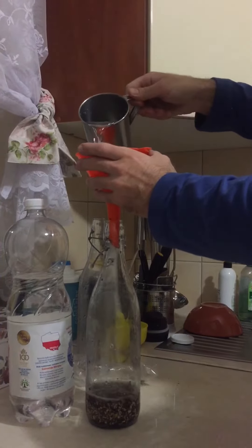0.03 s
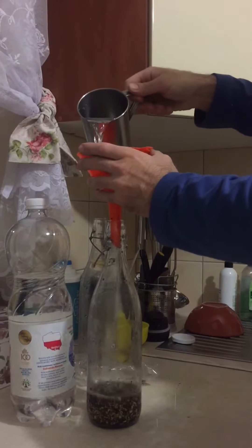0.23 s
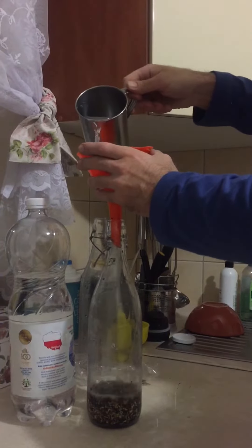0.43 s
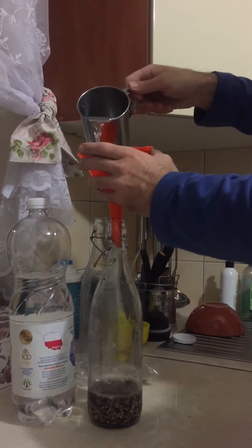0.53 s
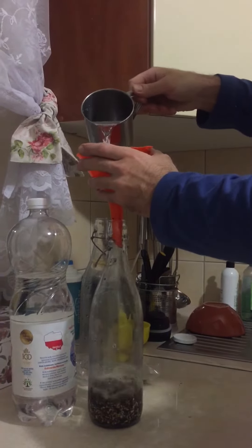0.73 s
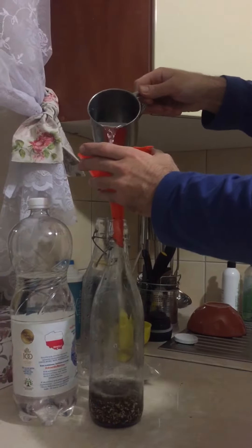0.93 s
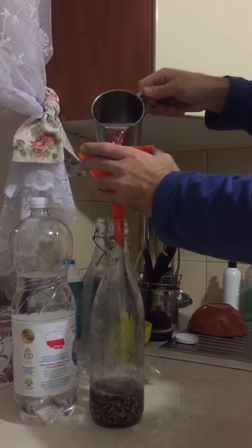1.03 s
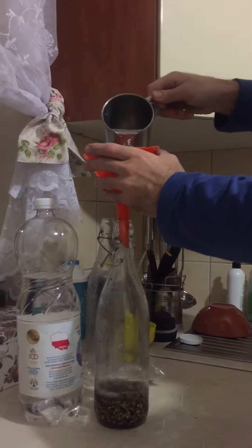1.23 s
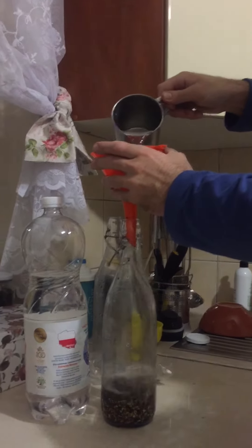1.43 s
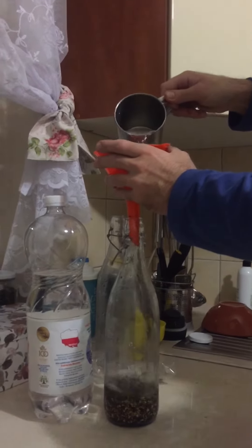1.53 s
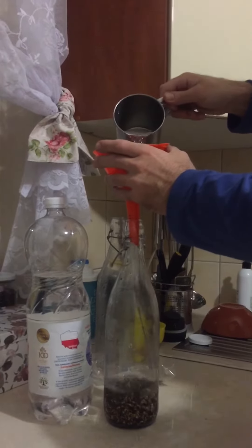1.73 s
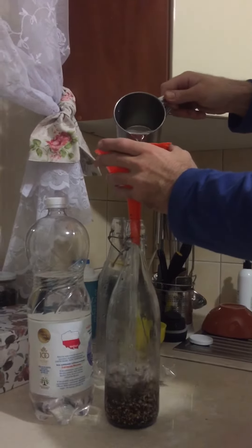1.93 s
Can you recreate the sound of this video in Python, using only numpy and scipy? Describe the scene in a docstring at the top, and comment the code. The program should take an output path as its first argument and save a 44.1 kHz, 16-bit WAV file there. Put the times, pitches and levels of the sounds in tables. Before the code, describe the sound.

Liquid poured from a metal jug gulps and bubbles down a funnel into a hollow-sounding glass bottle. The funnel ticks lightly, then the flow eases to a trickle, close to the microphone with a short kitchen echo.

```python
"""Gulps and ringing plops of liquid, poured from a metal jug through a plastic funnel into a glass bottle.
The stream sloshes, traps bubbles, throws droplets and stirs the air in the bottle, and the funnel ticks
against the neck; a faint, very high tick comes at the end. Heard close, as from one microphone in a
small kitchen: worktop and tiled walls give a short echo over a low room rumble."""
import sys
import numpy as np
from scipy import signal
from scipy.fft import rfft, irfft
from scipy.io import wavfile

SR = 44100
rng = np.random.default_rng(int(sys.argv[2]) if len(sys.argv) > 2 else 0)


def store_pcm(level_fs):
    """Save levels as 16-bit WAV."""
    pcm = np.round(np.clip(level_fs, -1, 1) * 32767).astype(np.int16)
    wavfile.write(sys.argv[1], SR, np.atleast_2d(pcm).T)


N = 88200
T = np.arange(N) / SR


def undb(db):
    """Decibels to gain."""
    return 10 ** (np.asarray(db) / 20)


def unit(x):
    """Scale to rms 1."""
    return x / np.sqrt(np.mean(x ** 2) + 1e-20)


def curve(table, column=1):
    """Gain through time from rows of time_s and a level_db in the chosen column."""
    rows = np.array(table)
    return undb(np.interp(T, rows[:, 0], rows[:, column]))


def colour(x, points):
    """Filter by rows of frequency_hz, gain_db."""
    hz, db = np.array(points).T
    bins_hz = np.maximum(np.fft.rfftfreq(len(x), 1 / SR), 1)
    return irfft(rfft(x) * undb(np.interp(np.log(bins_hz), np.log(hz), db)), len(x))


def cut(x, order, hz, kind):
    """Low-, high- or band-pass filter."""
    return signal.sosfilt(signal.butter(order, hz, kind, fs=SR, output="sos"), x)


def band(x, hz, octaves):
    """Band-pass around a centre."""
    ratio = 2 ** (octaves / 2)
    return cut(x, 2, [hz / ratio, min(hz * ratio, SR / 2 - 1)], "band")


def add(out, start_s, x):
    """Mix a sound in at a time."""
    i = max(int(start_s * SR), 0)
    out[i:i + len(x)] += x[:max(len(out) - i, 0)]


def fade(t, t60_s):
    """Exponential ring-down, 60 dB in t60_s."""
    return np.exp(-np.log(1000) * t / t60_s)


def bubble(hz, cycles):
    """Trapped air rings as a damped tone that swells and rises a little as it nears the surface."""
    life_s = cycles / hz
    pitch_rise, onset_share = 0.0067, 0.017
    t = T[:int(life_s * SR) + 2]
    swell = (1 - np.exp(-t / (life_s * onset_share))) ** 2
    phase = 2 * np.pi * hz * t * (1 + pitch_rise * t / life_s / 2)
    return np.sin(phase) * fade(t, life_s) * swell


def plops():
    """The stream drags large bubbles under, and each rings at its own pitch."""
    # single bubbles: start_s, pitch_hz, level_db, life_cycles
    large_bubbles = [(0.009, 1330, -32, 28), (0.093, 2164, -39, 120), (0.198, 1006, -31.5, 17),
                     (0.216, 660, -47, 52), (0.259, 953.5, -18.5, 74), (0.2621, 1340, -22.5, 25),
                     (0.281, 965.5, -25, 67), (0.296, 995, -29, 54), (0.32, 822, -33.5, 45),
                     (0.350, 966, -39.5, 60), (0.404, 3060, -44.5, 105), (0.411, 1030, -44.5, 40),
                     (0.613, 1301, -40.5, 176), (0.641, 1128, -22.5, 19.6), (0.662, 1098, -31, 134),
                     (0.692, 1163, -32, 126), (0.789, 1380, -39, 27), (0.843, 1510, -37, 45),
                     (0.861, 5610, -38, 96), (1.162, 1324, -46, 58), (1.221, 1230, -33, 64),
                     (1.251, 1220, -32, 34), (1.343, 554, -39, 20), (1.4002, 1390, -25, 28),
                     (1.402, 760, -35.5, 33), (1.402, 3154, -39, 99), (1.426, 1246, -31, 49),
                     (1.455, 1178, -39.5, 95), (1.486, 2280, -36.5, 25), (1.522, 5600, -36.5, 38),
                     (1.564, 4010, -45.5, 81), (1.722, 1015, -46, 29), (1.865, 4000, -49.5, 97),
                     (1.934, 1704, -47.5, 67)]
    out = np.zeros(N)
    for start_s, hz, db, cycles in large_bubbles:
        add(out, start_s, undb(db) * bubble(hz, cycles))
    return out


def showers(table, octaves, cycles, scatter_db, swell, count):
    """Each row is a shower of short, damped tones around one pitch that builds up and dies away."""
    out = np.zeros(N)
    for start_s, hz, db, decay_s in table:
        shower = np.zeros(SR // 3)
        for k, (when, pitch, size) in enumerate(rng.random((count, 3))):
            age = 3 * ((k + when) / count) ** 1.3  # in decay times, like swell
            strength = np.exp(-.8 * age) * (1 - np.exp(-age / swell)) * undb(scatter_db * size)
            add(shower, age * decay_s, strength * bubble(hz * 2 ** (octaves * (pitch - .5)), cycles))
        shower = band(shower, hz, 2.17 * octaves)
        energy = np.sum(shower ** 2) + 1e-20
        add(out, start_s, undb(db) * shower * np.sqrt(decay_s * SR / 2 / energy))
    return out


def gulps():
    """The liquid churns in gulps, each a cluster of low, quickly damped bubbles."""
    # sloshes: start_s, centre_hz, level_db, decay_s
    sloshes = [(0.018, 760, -48, 0.032), (0.087, 830, -45.5, 0.032), (0.197, 820, -41.5, 0.043),
               (0.205, 242, -48.5, 0.05), (0.263, 750, -43, 0.027), (0.268, 316, -46, 0.04),
               (0.285, 1310, -48.5, 0.035), (0.537, 760, -42.5, 0.014), (0.54, 304, -43.5, 0.021),
               (0.643, 940, -38.5, 0.011), (0.666, 396, -41, .02), (0.795, 327, -53, .05),
               (0.95, 1150, -50.5, 0.027), (0.982, 774, -43, 0.038), (1.215, 1250, -59.5, 0.035),
               (1.24, 382, -50.5, 0.028), (1.325, 1380, -53.5, 0.058), (1.358, 486, -47, 0.029),
               (1.406, 1030, -43.5, .04)]
    return showers(sloshes, octaves=0.95, cycles=3.87, scatter_db=-7.5, swell=0.091, count=50)


def bright_patter():
    """Bright patter of droplets, and a faint, very high tick at the end."""
    # droplet patter, then the high tick in the last row: start_s, centre_hz, level_db, decay_s
    bright_bursts = [(0.086, 6450, -48, 0.017), (0.148, 7200, -57.5, 0.02), (0.285, 2220, -56.5, 0.049),
                     (0.293, 4840, -60, 0.037), (0.311, 8850, -60, 0.014), (0.428, 3230, -55.5, 0.019),
                     (0.561, 4270, -47.5, 0.011), (0.562, 2200, -52, 0.018), (0.614, 2430, -46.5, 0.015),
                     (0.639, 3120, -48.5, 0.0097), (0.726, 3500, -55.5, 0.027), (0.775, 4630, -58.5, 0.018),
                     (0.857, 5000, -58, 0.017), (0.863, 3770, -54.5, 0.015), (0.899, 4020, -55, 0.016),
                     (0.982, 4500, -53.5, 0.019), (1.063, 2310, -45.5, 0.014), (1.064, 9600, -63.5, 0.01),
                     (1.161, 2570, -49, 0.028), (1.335, 3160, -52.5, 0.02), (1.485, 1700, -54, 0.046),
                     (1.543, 8080, -63, 0.0088), (1.974, 13900, -58, 0.01)]
    return glass(showers(bright_bursts, octaves=0.5, cycles=12.5, scatter_db=9, swell=0.16, count=80))


def swarm(low_hz, high_hz, cycles, scatter_db, count):
    """Small bubbles of random time, pitch and size."""
    out = np.zeros(N)
    for when, pitch, size, ring in rng.random((count, 4)):
        strength = undb(scatter_db * min(-np.log(1 - size), np.pi + 1))  # many faint, a few loud
        hz = low_hz * (high_hz / low_hz) ** pitch
        add(out, when * N / SR, strength * bubble(hz, cycles * (.5 + ring)))
    return unit(out)


def stream():
    """Babble of middling bubbles and a soft fizz of tiny ones deep in the bottle."""
    # strength of the steady pour: time_s, babble_db, fizz_db
    flow = [(0, -51.5, -58), (.07, -53.5, -68.5), (.14, -55, -62), (.33, -51.5, -61), (.41, -60.5, -64.5),
            (.51, -61, -65.5), (.65, -52, -54), (.75, -56.5, -67.5), (.85, -58.5, -65), (1.12, -65, -64),
            (1.3, -55, -64), (1.42, -58, -62), (1.6, -61, -64), (1.78, -67.5, -69.5), (2, -60.5, -67.5)]
    # spectra of the two layers: frequency_hz, gain_db
    babble_spectrum = [(200, 0.5), (300, -3), (500, -6), (900, -1.5), (1400, 10), (1700, -3.5),
                       (2500, 12.5)]
    fizz_spectrum = [(1500, -1.5), (2400, 2.5), (3300, 4.5), (6000, 3), (8000, -3), (11000, -2), (16000, 1)]
    babble = colour(swarm(220.4, 1719, cycles=34.0, scatter_db=1.5, count=900), babble_spectrum)
    tiny_bubbles = swarm(1900, 15000, cycles=40, scatter_db=2.9, count=2600)
    smeared = unit(glass(glass(tiny_bubbles)))
    hiss = undb(-13) * rng.standard_normal(N)
    fizz = colour(smeared + hiss, fizz_spectrum)
    return unit(babble) * curve(flow, column=1) + unit(fizz) * curve(flow, column=2)


def glass(x):
    """Short sounds bounce between the bottle's walls, which smears them."""
    t = T[:SR // 10]
    echo_gain = undb(-3.5)
    walls = unit(rng.standard_normal(len(t)) * fade(t, t60_s=0.038)) / np.sqrt(len(t))
    return (x + echo_gain * signal.fftconvolve(x, walls)[:N]) / np.hypot(1, echo_gain)


def cavity(x):
    """The enclosed air rings on after each splash."""
    # air resonances of bottle and funnel: pitch_hz, relative_db
    air_modes = [(265, -9.5), (334, -4), (625, 0.5), (705, 5.5), (825, -22), (939, 9), (991, 6),
                 (1129, 3.5), (1379, -31)]
    t, t60_s = T[:SR // 2], 0.26
    ring = sum(undb(db) * np.cos(2 * np.pi * hz * t) for hz, db in air_modes) * fade(t, t60_s)
    resonant_gain = t60_s * SR / (2 * np.log(1000))
    return undb(-1.5) * signal.fftconvolve(x, ring)[:N] / resonant_gain


def funnel_ticks():
    """The funnel touches the bottle neck and rings a few rough high modes."""
    # contacts: start_s, relative_db
    touches = [(0.561, -41), (0.641, -39.5), (0.651, -56.5)]
    # modes of a tick: pitch_hz, relative_db, t60_s, width_octaves
    neck_modes = [(4535, -4.5, 0.17, 0.079), (5800, 5, 0.037, 0.17), (8660, -2.5, 0.055, 0.12),
                  (11470, -2, 0.034, 0.19), (14900, -7, 0.036, 0.2)]
    out, t = np.zeros(N), T[:SR // 4]
    attack = 1 - np.exp(-t / 0.003)
    for start_s, db in touches:
        ring = sum(undb(mode_db) * fade(t, t60_s) * unit(band(rng.standard_normal(len(t)), hz, octaves))
                   for hz, mode_db, t60_s, octaves in neck_modes)
        add(out, start_s, undb(db) * ring * attack / 2)
    return out


def hoots():
    """A surge of liquid sounds the bottle's hollow note, which swells, sags a little and fades."""
    # surges: peak_s, level_db, half_length_s
    surges = [(0.396, -50, 0.059), (1.525, -60.5, 0.043)]
    pitch_hz, sag_hz_per_s = 204.6, 30
    out = np.zeros(N)
    for peak_s, db, half_length_s in surges:
        t = T - peak_s
        tone = np.sqrt(2) * np.sin(2 * np.pi * t * (pitch_hz - sag_hz_per_s * t / 2))
        out += undb(db) * tone * np.exp(-(t / half_length_s) ** 2)
    return out


def kitchen(x):
    """The direct sound, then a short diffuse tail from worktop and tiles, duller as it fades."""
    t, split_hz = T[:SR // 2], 2500
    noise = rng.standard_normal(len(t))
    low = cut(noise, 2, split_hz, "low") * fade(t, t60_s=0.21)
    high = cut(noise, 2, split_hz, "high") * fade(t, t60_s=0.17)
    tail = (low - high) * (1 - np.exp(-t / 0.001))
    response = undb(-7.5) * unit(tail) / np.sqrt(len(t))
    return x + signal.fftconvolve(x, response)[:N]


def room_rumble():
    """A low, narrow resonance stirred at random, its swings partly evened out."""
    # swells of the rumble: time_s, level_db
    swells = [(0, -77.5), (.55, -72.5), (.63, -60), (.72, -75), (1.6, -71), (1.87, -62), (2, -59)]
    noise = band(rng.standard_normal(N + SR), hz=69.6, octaves=0.29)
    analytic = signal.hilbert(noise)[SR:]
    evened = analytic.real / (abs(analytic) + 1e-12) ** 0.29
    return unit(evened) * curve(swells)


def room_tone():
    """The kitchen's faint, steady, dull noise."""
    # background spectrum: frequency_hz, gain_db
    spectrum = [(25, -12), (50, 12), (100, 8), (200, 8), (500, -5), (1200, -2), (2500, -11.5), (6000, -17),
                (10000, -22), (16000, -42)]
    return undb(-65) * unit(colour(rng.standard_normal(N), spectrum))


def scene():
    """The pour and its bottle at the microphone, in mono, over the kitchen's background."""
    churn, patter = gulps(), bright_patter()
    bubbles = plops() + stream() + churn
    liquid = cut(bubbles, 3, hz=194, kind="high") + patter  # small bubbles radiate no bass
    background = room_rumble() + room_tone()
    bottle = liquid + cavity(liquid) + funnel_ticks()
    return (kitchen(bottle) + hoots() + background)[None]


def record(dry):
    """The recorder cuts the top treble steeply."""
    top_hz = 15900
    return signal.sosfilt(signal.ellip(10, .2, 70, top_hz, fs=SR, output="sos"), dry)


dry = scene()
out = record(dry)
store_pcm(out)
```